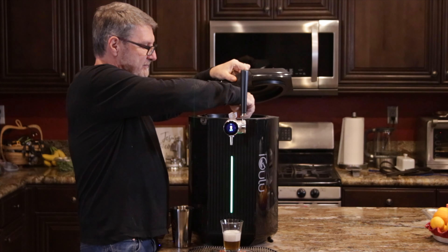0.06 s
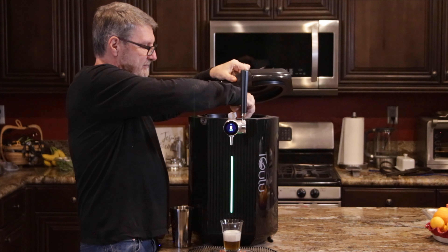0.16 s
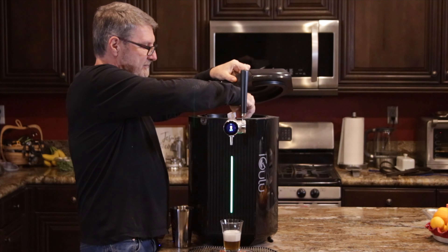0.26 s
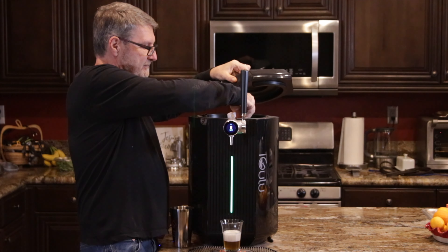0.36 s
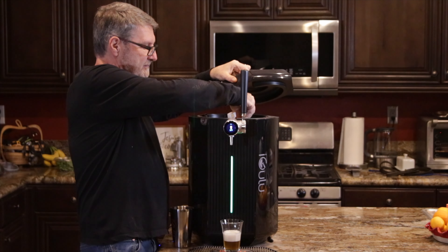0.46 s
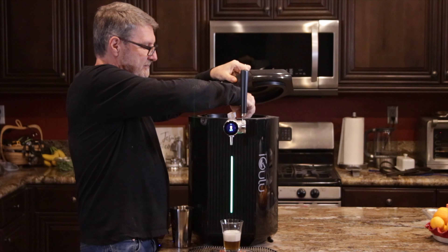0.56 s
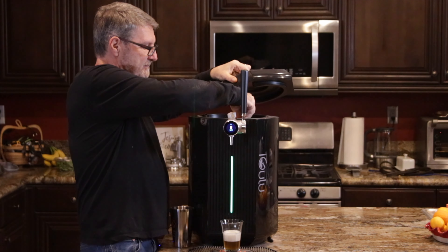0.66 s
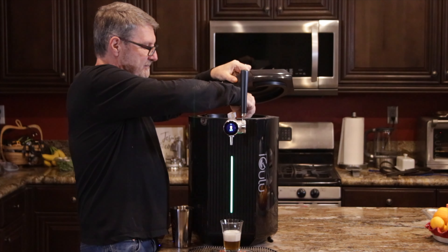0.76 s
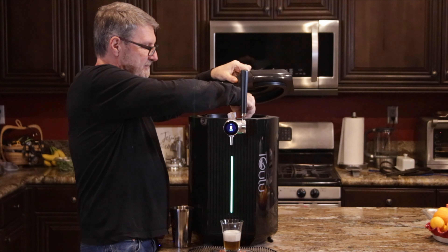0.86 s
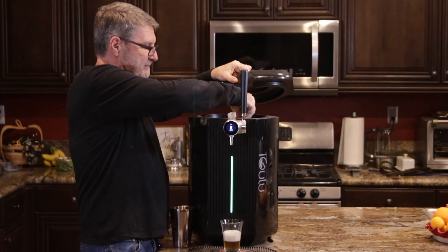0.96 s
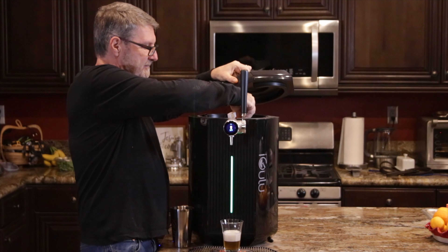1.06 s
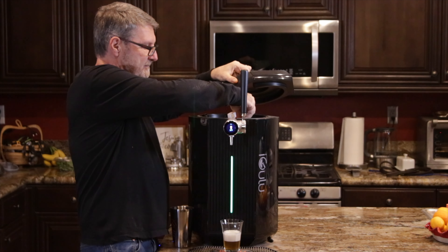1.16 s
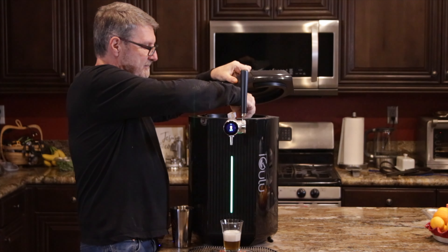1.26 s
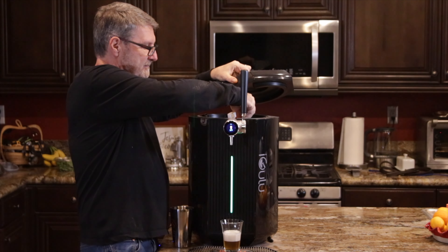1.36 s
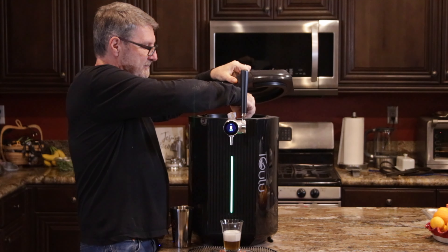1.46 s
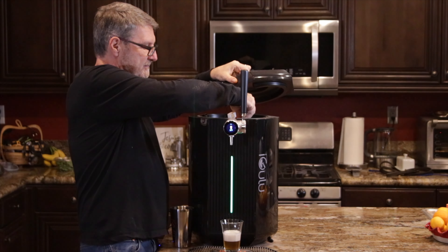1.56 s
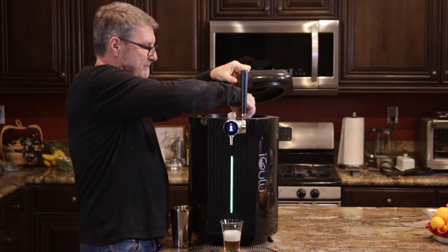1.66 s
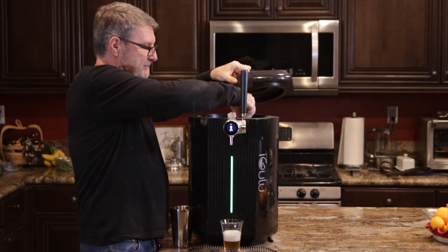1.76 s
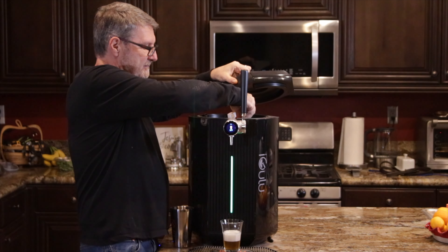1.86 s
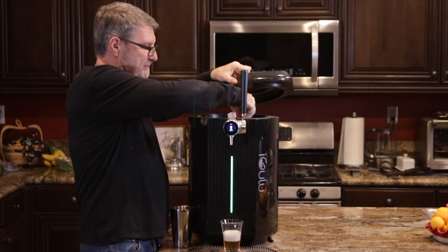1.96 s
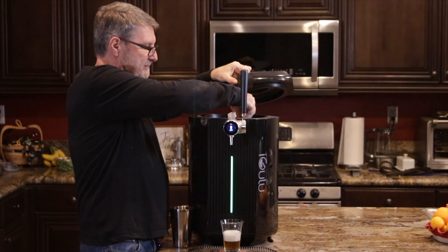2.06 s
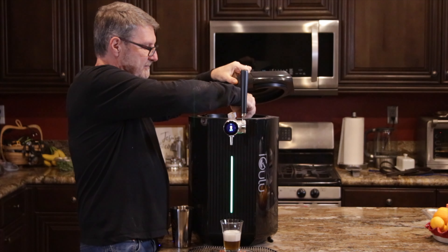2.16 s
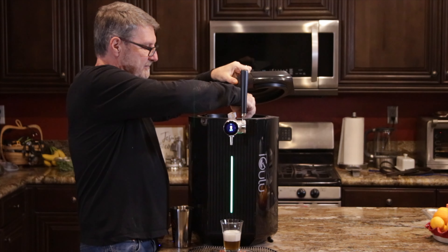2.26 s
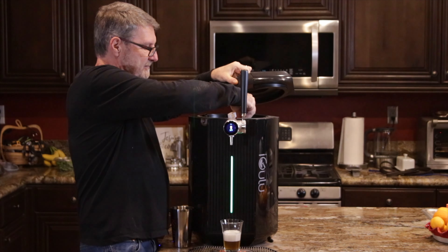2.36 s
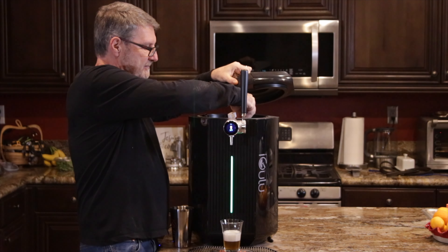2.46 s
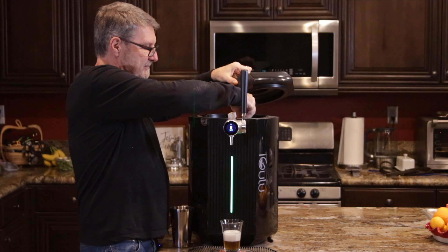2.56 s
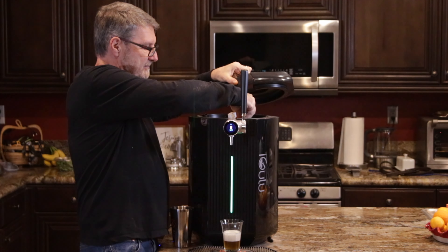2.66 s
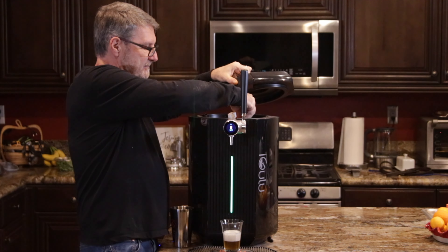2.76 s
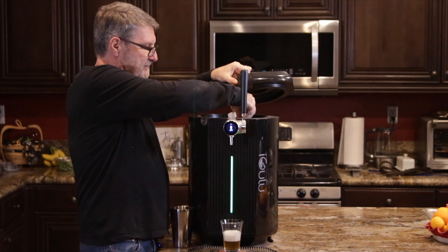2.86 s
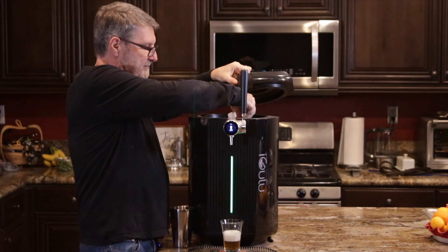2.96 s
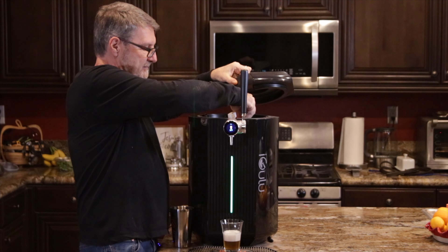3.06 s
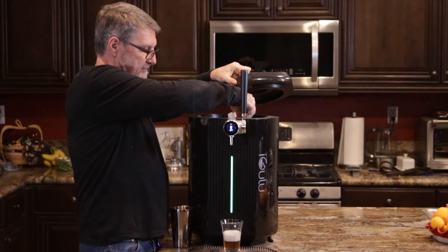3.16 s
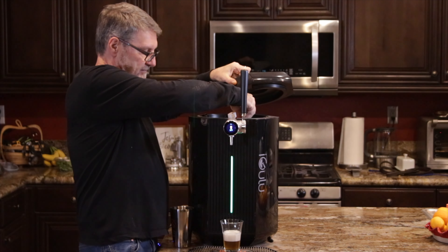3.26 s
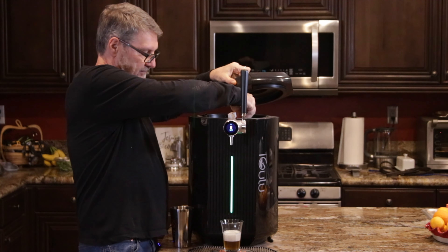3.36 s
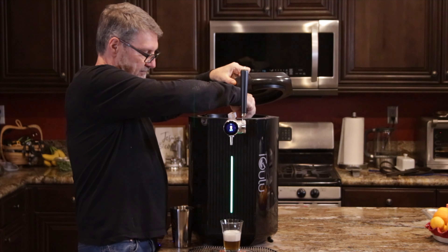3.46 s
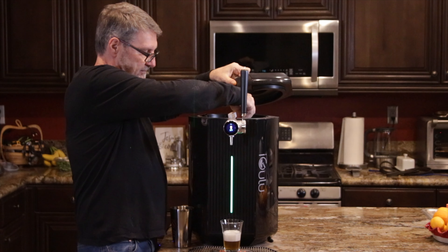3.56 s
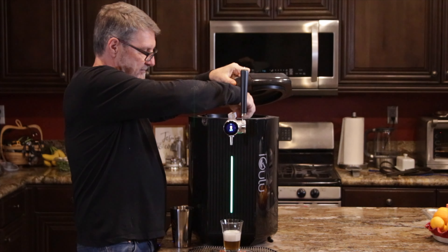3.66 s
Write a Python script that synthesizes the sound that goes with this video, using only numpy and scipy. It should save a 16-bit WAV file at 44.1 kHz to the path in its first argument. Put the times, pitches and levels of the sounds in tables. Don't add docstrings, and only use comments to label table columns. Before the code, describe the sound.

Gas hisses loudly from a keg valve, close to a stereo microphone in a quiet kitchen. After faint room tone and handling rumble, a soft double thump at 0.2 s opens a bright, turbulent blast. It stays steady, then dulls and weakens from about 2 s, over hollow keg rush and a faint metallic ring growing after 1 s. It shuts off around 3.45 s; soft hand thumps follow at 3.6-3.7 s.

```python
import sys
import numpy as np
from scipy import signal
from scipy.fft import rfft, irfft
from scipy.io import wavfile
from scipy.ndimage import uniform_filter1d

SR = 44100
rng = np.random.default_rng(int(sys.argv[2]) if len(sys.argv) > 2 else 0)


def volts_from_decibels(level):
    exponent = np.asarray(level, float) / 20
    return 10 ** exponent


def unload_wav(signal):
    wavfile.write(
        sys.argv[1],
        SR,
        np.round(np.clip(np.atleast_2d(signal).T, -1, 1) * 32767).astype(np.int16),
    )


N = 163170
TIME = np.arange(N) / SR

# f/Hz, level/dB per Hz
ROOM_COLOUR = [(25, -12), (90, -2), (200, -5.5), (350, 2.5), (510, -7), (870, -5), (1170, -9),
               (15500, -10.5)]
# f/Hz, level/dB per Hz
MIC_COLOUR = [(25, -16), (100, -6), (300, -6.5), (800, -10.5), (1200, -20.5), (15500, -18)]
# t/s, level/dB, pressure lost (below 0 first blast, 0 full, 1 spent, above 1.1 barely open)
JET_COURSE = [(.12, -79, 4), (.15, -56.5, 2.8), (0.198, -32, 0.51), (0.218, -20, -0.25), (.26, -22, 0.16),
              (.38, -24, 0), (.43, -22, 0), (.48, -23, 0), (.76, -24, 0.19), (1.3, -24.5, 0.23),
              (2.1, -24, 0.52), (2.449, -26.5, 0.65), (3.0, -30, 0.88), (3.442, -32, 1.05),
              (3.47, -43.5, 1.2), (3.51, -52, 6), (3.55, -66, 2.1)]
# f/Hz, level/dB per Hz
FULL_COLOUR = [(590, -40), (1000, -22), (2010, -22), (3570, -3.5), (5040, 0), (5920, -10.5), (10700, -9.5),
               (14600, -14), (15500, -21)]
HALF_COLOUR = [(590, -54), (1000, -23.5), (1970, -25), (2910, -9), (4600, 0.5), (5720, -8.5), (8840, -14),
               (10400, -12), (15500, -21.5)]
SPENT_COLOUR = [(590, -46), (1000, -40.5), (1130, -26.5), (2260, -16.5), (3650, -2), (4600, -0.5),
                (5590, -9.5), (14800, -25), (15500, -29)]
# f/Hz, width/Hz, level/dB
FULL_RINGS = [(3730, 210, -2), (4590, 200, 0.5), (5080, 330, -7.5), (6220, 150, -3), (8100, 290, -3),
              (9500, 230, -11.5), (10630, 370, -2), (12600, 110, -11), (13200, 230, 1), (14960, 200, -2)]
HALF_RINGS = [(3850, 330, -0.5), (4650, 330, -2.5), (6330, 150, -7), (7620, 180, -7), (8600, 84, -16),
              (9440, 230, -10.5), (9770, 270, -5), (10660, 94, -11), (10700, 54, -21), (12600, 230, -15),
              (12900, 170, -12), (14500, 470, -19)]
SPENT_RINGS = [(3870, 410, -2), (4560, 140, 2), (5690, 68, -21), (7020, 43, -14), (7280, 59, -16),
               (8800, 180, -6), (9270, 75, -11), (10670, 59, -8), (12500, 230, -20), (12800, 110, -21),
               (13500, 160, -20), (14300, 84, -23)]
# f/Hz, width/Hz, level/dB
HAND_NOTCHES = [(4260, 170, -4), (5750, 290, -2), (8000, 160, -2.5), (8940, 360, -3.5), (11600, 310, -4),
                (14000, 210, 3.5)]
# f/Hz, level/dB per Hz
KEG_COLOUR = [(40, -35), (86, -21), (120, -8.5), (295, -3.5), (540, -6.5), (813, -7.5), (1090, -15),
              (2000, -12.5)]
# t/s, peak level/dB, push length/s, sign
THUMPS = [
    (.206, -35, 0.011, 1),
    (.223, -28.5, 0.0081, -1),
    (3.602, -35.5, 0.0065, 1),
    (3.616, -49, 0.014, -1),
    (3.672, -51, 0.0067, -1),
    (3.695, -54, .008, 1),
]

ROOM_DB, MIC_DB, MIC_DUCK_DB = -57.5, -62, -13
RUMBLE_HZ, RUMBLE_WIDTH_HZ, RUMBLE_DB = 65, 81, -64
RUMBLE_STOP_S, RUMBLE_BACK_S = 0.17, 3.54
BROAD_DB, RING_DB = -0.5, -3.5
CRACK_HZ, CRACK_WIDTH_HZ, CRACK_DB, BLAST_DB = 4100, 940, -6, 4
PATCH_DB, RIPPLE_DB = 0.34, 1.16
SURGE_DB, FLUTTER_DB, SPIT_DB = 0.38, 0.55, 1.0
KEG_OPEN_S, KEG_ATTACK_S, KEG_SHUT_S, KEG_RELEASE_DB_S = 0.179, 0.029, 3.42, -56
KEG_DB, KEG_SAG_DB = -47, -4
BELLY_HZ, BELLY_WIDTH_HZ, BELLY_DB = 332, 60, 3.5
BASS_DUCK_DB, RECOVER_S = -4.5, 1.9
HEAD_HZ, HEAD_WIDTH_HZ, HEAD_DB, HEAD_FADE_DB = 886, 216, -47.5, -11.5
SHELL_HZ, SHELL_WIDTH_HZ, SHELL_DB, SHELL_SWELL_DB = 840, 18, -74.5, 23.5
SHELL_START_S, SHELL_RISE_S = 1.05, 0.8
THUMP_PAN_DB, THUMP_RING_DB, THUMP_RING_S = 5, -15, 0.015
TOP_HZ = 15700


def level(x, db):
    return x * volts_from_decibels(db) / np.sqrt(np.mean(x ** 2))


def colour(table, hz):
    table = np.array(table)
    return np.interp(np.log(hz + 1), np.log(table[:, 0]), table[:, 1], left=-60)


def bell(hz, centre_hz, width_hz):
    return 1 / (1 + (2 * (hz - centre_hz) / width_hz) ** 2)


def shaped(gain):
    spectrum = rfft(rng.standard_normal(N))
    return level(irfft(spectrum * gain(np.fft.rfftfreq(N, 1 / SR)), N), 0)


def coloured(table, db):
    return shaped(lambda hz: volts_from_decibels(colour(table, hz))) * volts_from_decibels(db)


def walk(rate):
    return shaped(lambda hz: 1 / (1 + (hz / rate) ** 2))


def ducked(db):
    since = TIME - KEG_OPEN_S
    return volts_from_decibels(db * (since > 0) * np.clip(1 - (since / RECOVER_S) ** 2, 0, 1))


def room_tone():
    return coloured(ROOM_COLOUR, ROOM_DB)


def microphone_hiss():
    return coloured(MIC_COLOUR, MIC_DB) * ducked(MIC_DUCK_DB) * np.array([[1], [-1]])


def rumble():
    moving = 1.0 * ((TIME < RUMBLE_STOP_S) | (TIME > RUMBLE_BACK_S))
    moving = uniform_filter1d(moving, size=1500)
    return moving * volts_from_decibels(RUMBLE_DB) * shaped(lambda hz: bell(hz, RUMBLE_HZ, RUMBLE_WIDTH_HZ))


def valve_tone(hz, broad, rings):
    power = volts_from_decibels(2 * (colour(broad, hz) + BROAD_DB))
    for ring_hz, width_hz, db in rings:
        power = power + volts_from_decibels(2 * (db + RING_DB)) * bell(hz, ring_hz, width_hz) ** 2
    return 10 * np.log10(power)[:, None]


def smooth_chance(shape, bins, hops):
    field = uniform_filter1d(rng.standard_normal(shape), bins, axis=0)
    field = uniform_filter1d(field, hops, axis=1)
    return field / field.std()


def jet():
    hz, t, z = signal.stft(rng.standard_normal(N), SR, nperseg=1024)
    at, db, lost_at = np.array(JET_COURSE).T
    course = np.interp(t, at, lost_at)
    lost = np.clip(course, 0, 1.1)

    full = valve_tone(hz, FULL_COLOUR, FULL_RINGS)
    half = valve_tone(hz, HALF_COLOUR, HALF_RINGS)
    spent = valve_tone(hz, SPENT_COLOUR, SPENT_RINGS)
    early = full + 2 * lost * (half - full)
    late = half + (2 * lost - 1) * (spent - half)
    tone = np.where(lost < 0.5, early, late)

    off_crack = 1 - bell(hz, CRACK_HZ, CRACK_WIDTH_HZ)[:, None]
    edge = off_crack * (CRACK_DB * np.clip(course - 1.1, 0, 1) + BLAST_DB * np.clip(-course, 0, 1))
    notches = sum(d * bell(hz, f, w) for f, w, d in HAND_NOTCHES)[:, None]
    patches = PATCH_DB * smooth_chance(z.shape, 30, 6)
    comb = RIPPLE_DB * smooth_chance(z.shape, 2, 150)
    gain = volts_from_decibels(tone + notches + edge + patches + comb)

    presence = uniform_filter1d(np.sum(gain[58:140] ** 2, axis=0), size=9)
    gain = gain / np.sqrt(presence / len(hz))
    hiss = signal.istft(z * gain, SR, nperseg=1024)[1][:N]
    rough = SURGE_DB * walk(4.6) + FLUTTER_DB * walk(60) + SPIT_DB * walk(700)
    return hiss * volts_from_decibels(np.interp(TIME, at, db, left=-90, right=-90) + rough)


def keg_rush(cut, belly_db):
    def gain(hz):
        hollow = volts_from_decibels(colour(KEG_COLOUR, hz) + belly_db * bell(hz, BELLY_HZ, BELLY_WIDTH_HZ))
        low = 1 / (1 + (hz / 380) ** 4)
        return hollow / (1 + (hz / 2200) ** 6) * cut(low)
    return shaped(gain)


def keg():
    run = np.clip((TIME - KEG_OPEN_S) / (KEG_SHUT_S - KEG_OPEN_S), 0, 1)
    attack = np.clip((TIME - KEG_OPEN_S) / KEG_ATTACK_S, 0, 1) ** 2
    release = volts_from_decibels(KEG_RELEASE_DB_S * np.clip(TIME - KEG_SHUT_S, 0, None))

    rush = keg_rush(lambda low: 1 - low, 0) * volts_from_decibels(KEG_DB + KEG_SAG_DB * run + 1.65 * walk(3.5))
    bass = keg_rush(lambda low: low, BELLY_DB) * volts_from_decibels(KEG_DB - 4.5 + 1.2 * walk(3.3))
    bass = bass * ducked(BASS_DUCK_DB)
    head = shaped(lambda hz: bell(hz, HEAD_HZ, HEAD_WIDTH_HZ)) * volts_from_decibels(HEAD_DB + HEAD_FADE_DB * run ** 2)

    ring = 0.52 * shaped(lambda hz: bell(hz, SHELL_HZ, SHELL_WIDTH_HZ))
    ring = ring + np.sin(2 * np.pi * SHELL_HZ * TIME + 0.93 * walk(3.7))
    grown = np.clip((TIME - SHELL_START_S) / SHELL_RISE_S, 0, 1)
    shell = ring * volts_from_decibels(SHELL_DB + SHELL_SWELL_DB * np.sqrt(grown) - 3 * run ** 4)
    return attack * release * (rush + bass + head + shell)


def thumps():
    out = np.zeros(N)
    for at, db, length, sign in THUMPS:
        age = np.clip(TIME - at, 0, None)
        swing = age / length
        push = swing * 3 * np.exp(1 - swing * 3) * (1 - swing / 1.5)
        ring = volts_from_decibels(THUMP_RING_DB) * np.sin(2 * np.pi * SHELL_HZ * age) * np.exp(-age / THUMP_RING_S)
        out += volts_from_decibels(db) * sign * (push + ring)
    return out


def scene():
    lean_left = volts_from_decibels(np.array([[0.5], [-0.5]]) * THUMP_PAN_DB)
    hand = lean_left * (rumble() + thumps())
    return room_tone() + microphone_hiss() + jet() + keg() + hand


def low_pass(x):
    return signal.sosfilt(signal.butter(12, 15840, fs=SR, output="sos"), x)


def record(dry):
    top_cut = signal.ellip(8, 0.3, 50, TOP_HZ, fs=SR, output="sos")
    mix = signal.sosfilt(top_cut, dry)
    return low_pass(mix)


dry = scene()
out = record(dry)
unload_wav(out)
```